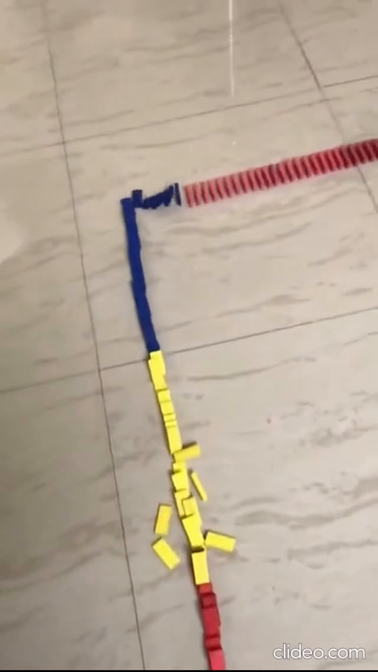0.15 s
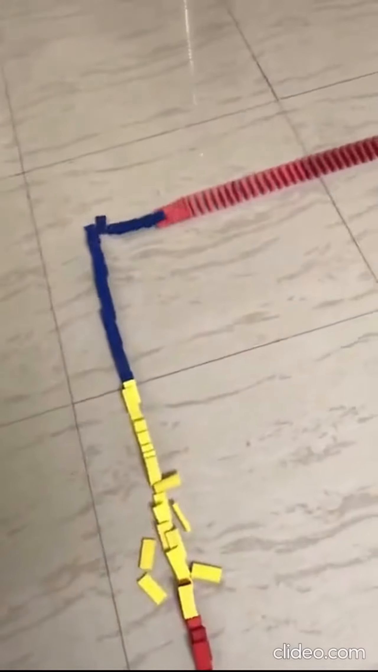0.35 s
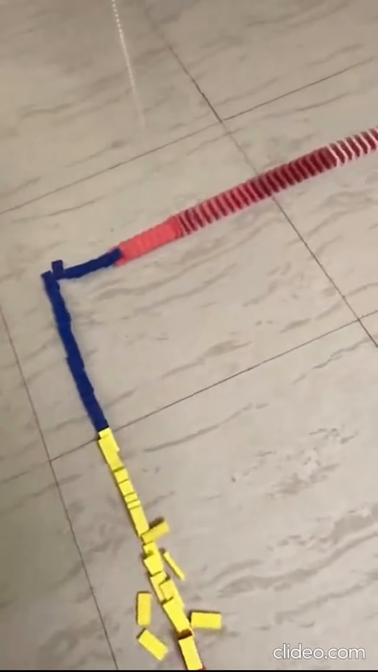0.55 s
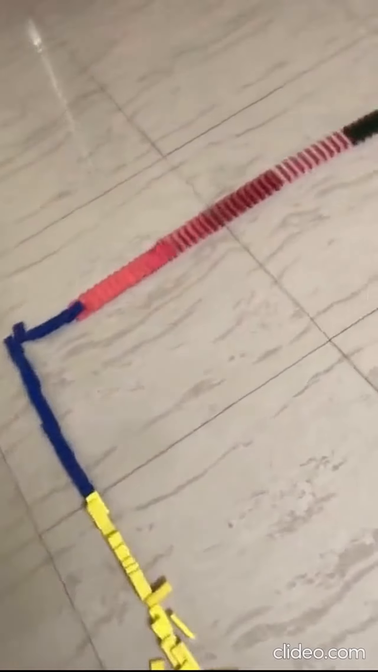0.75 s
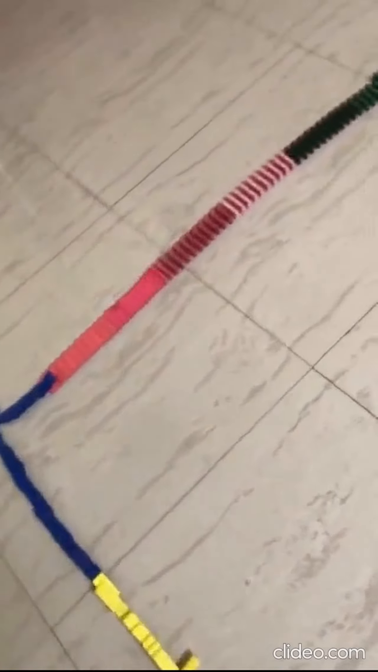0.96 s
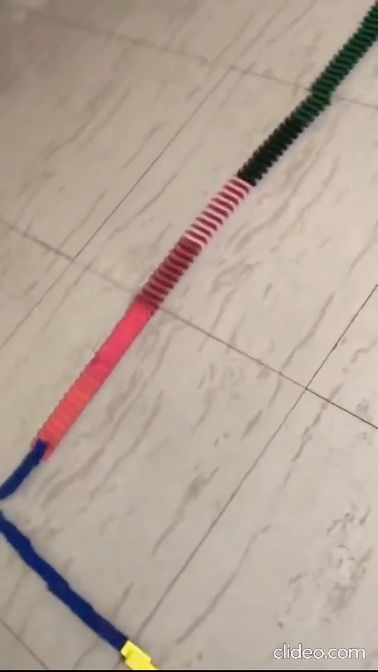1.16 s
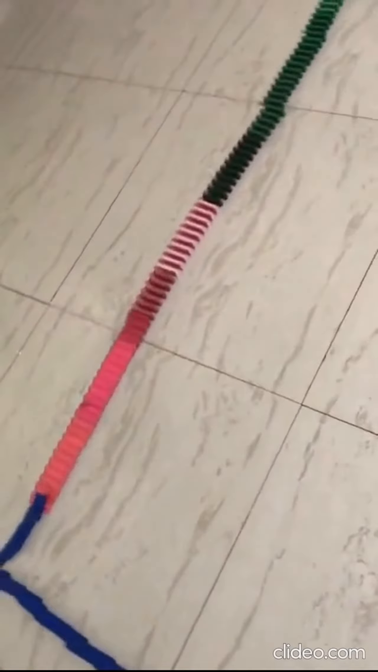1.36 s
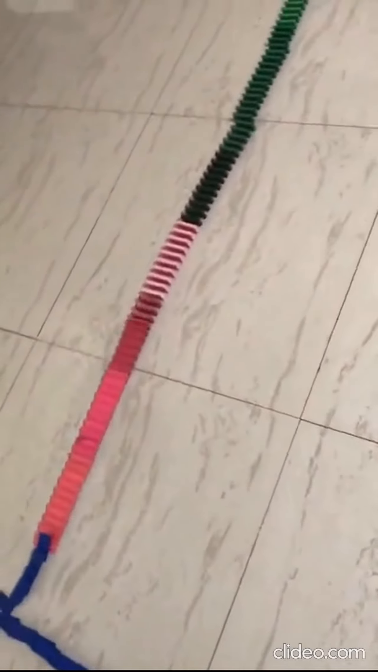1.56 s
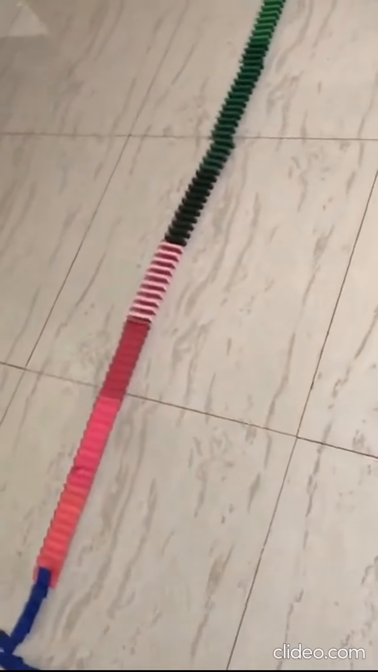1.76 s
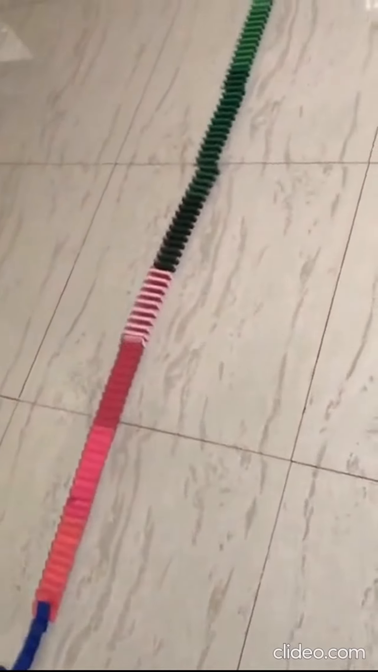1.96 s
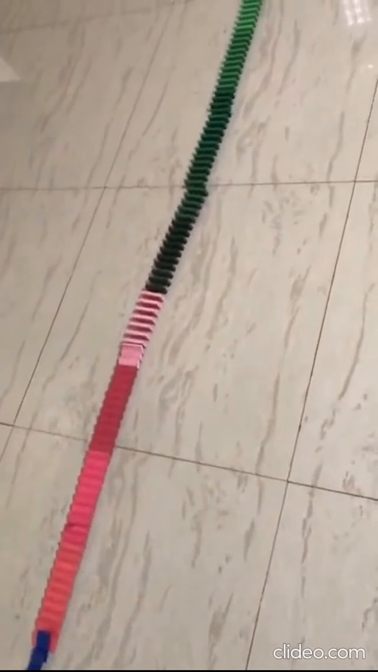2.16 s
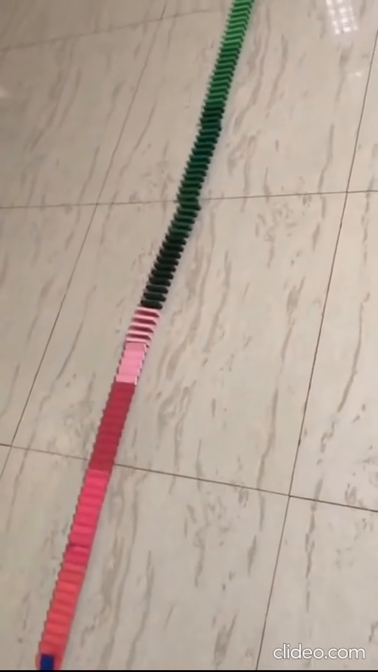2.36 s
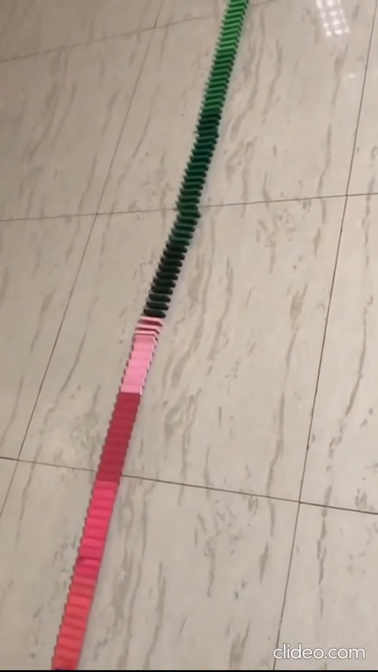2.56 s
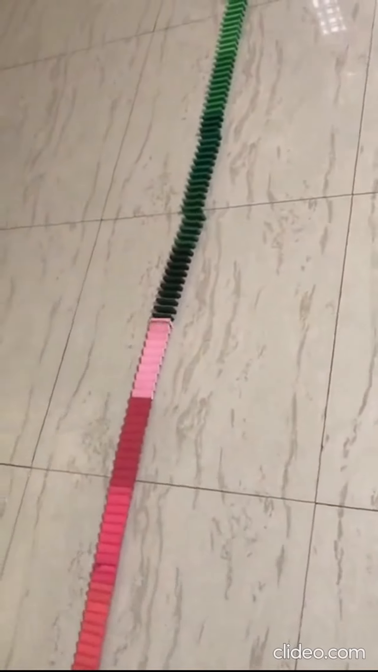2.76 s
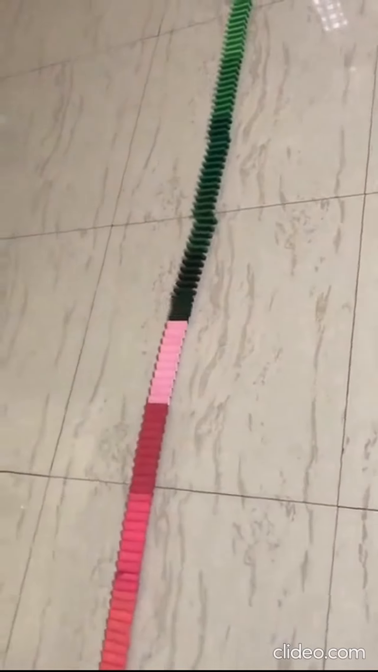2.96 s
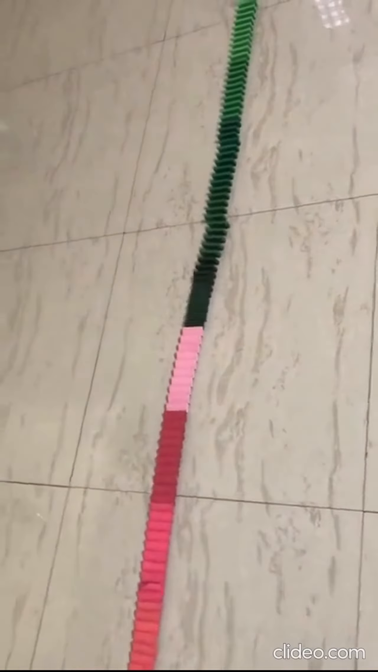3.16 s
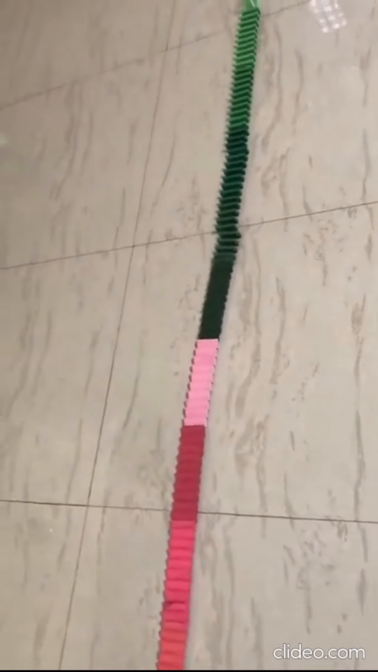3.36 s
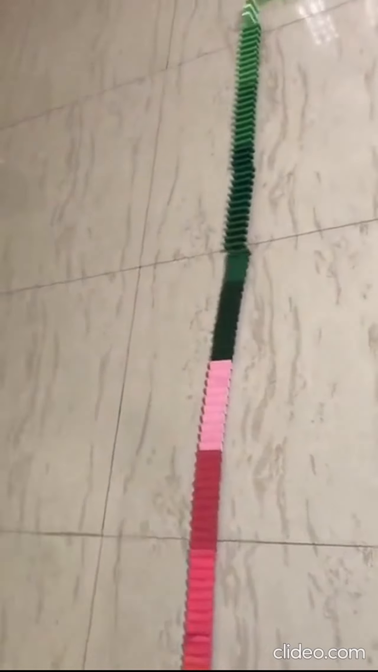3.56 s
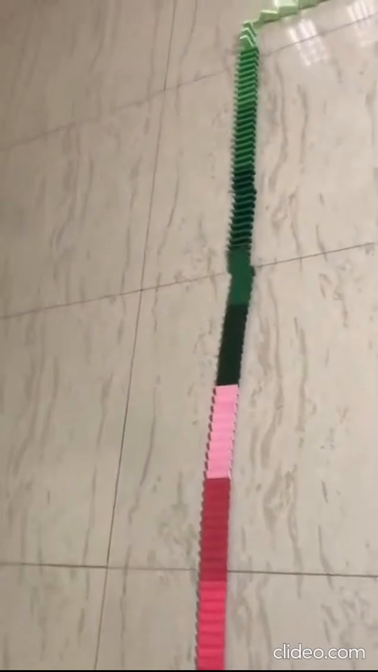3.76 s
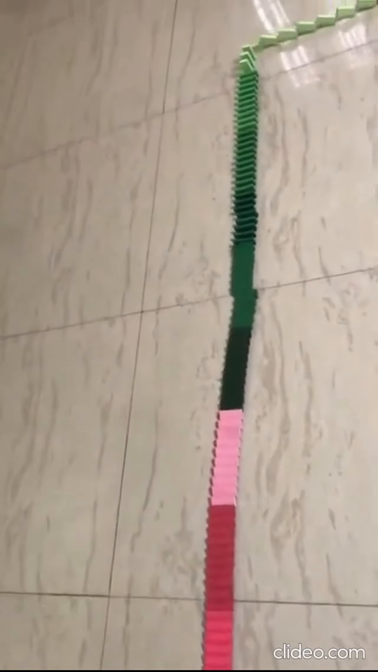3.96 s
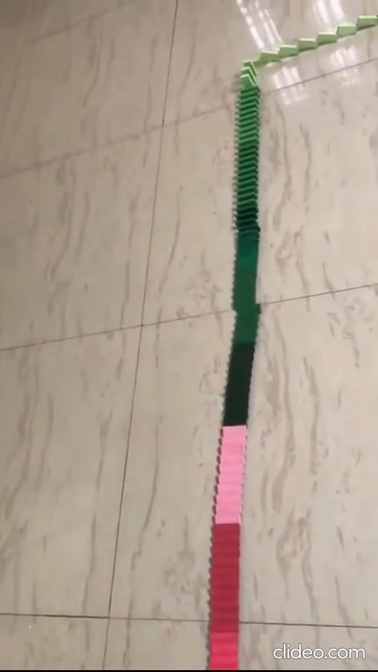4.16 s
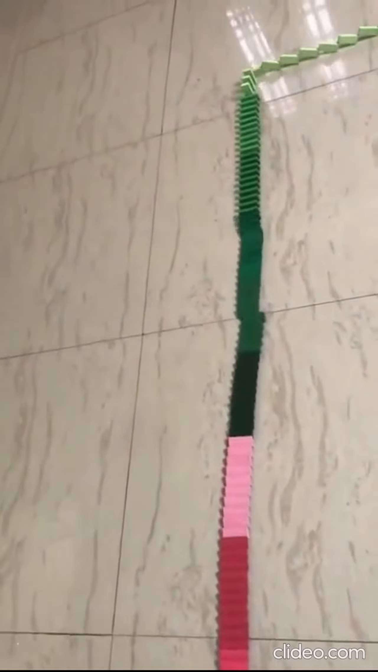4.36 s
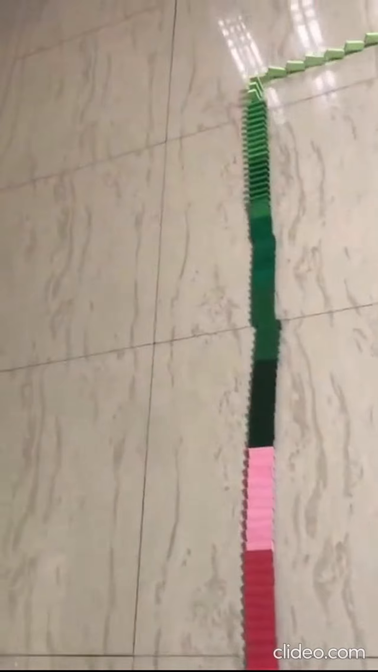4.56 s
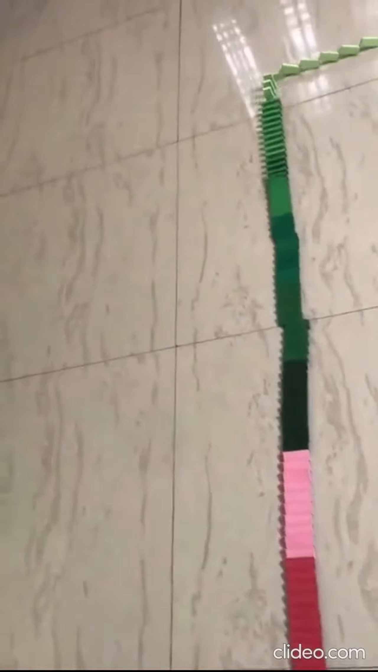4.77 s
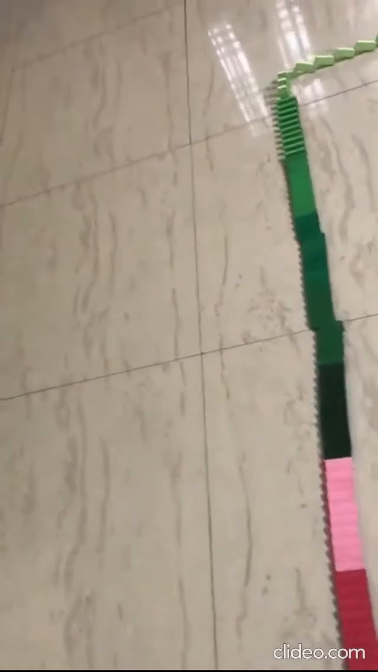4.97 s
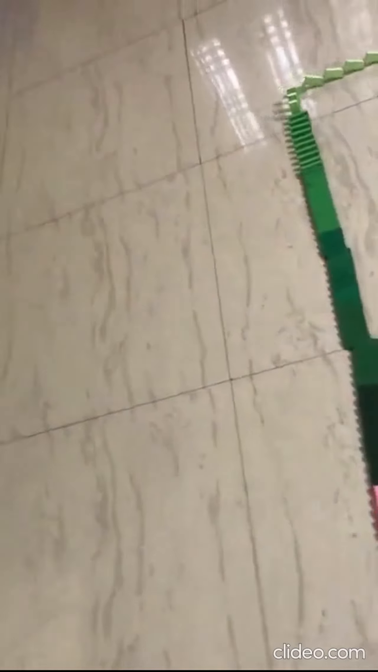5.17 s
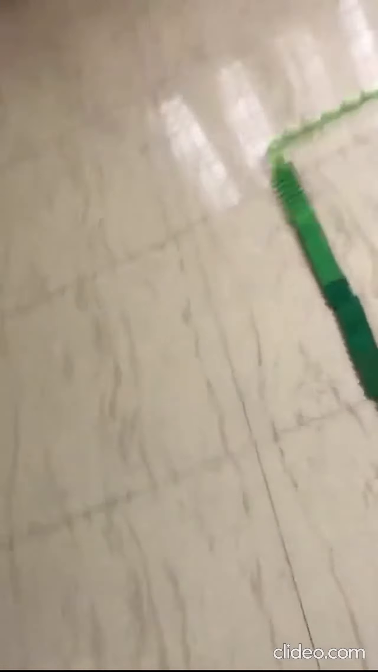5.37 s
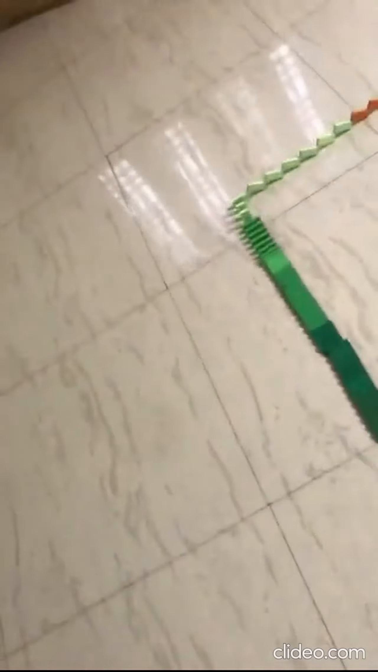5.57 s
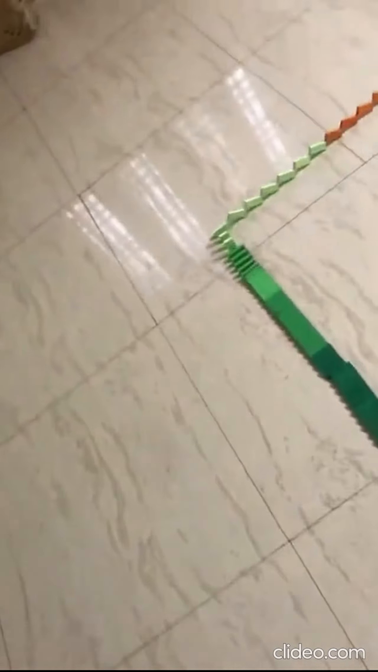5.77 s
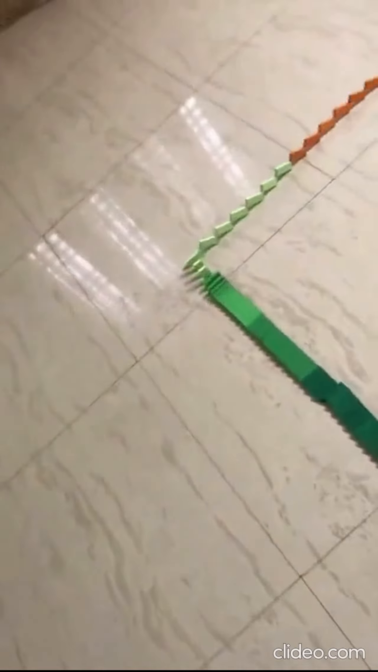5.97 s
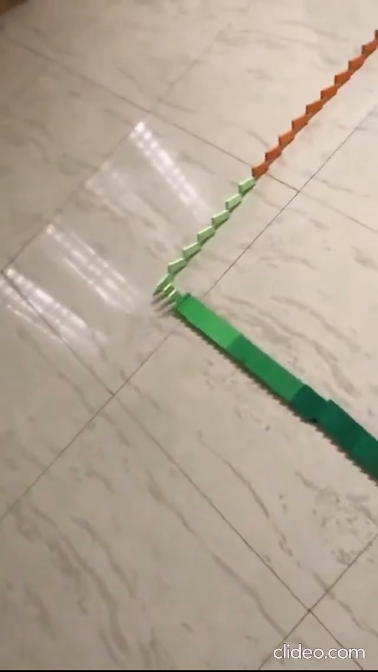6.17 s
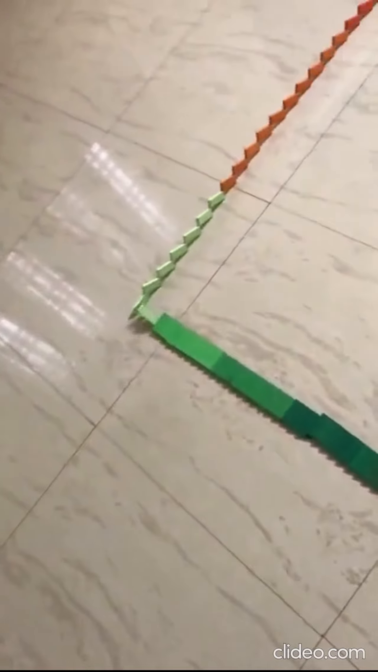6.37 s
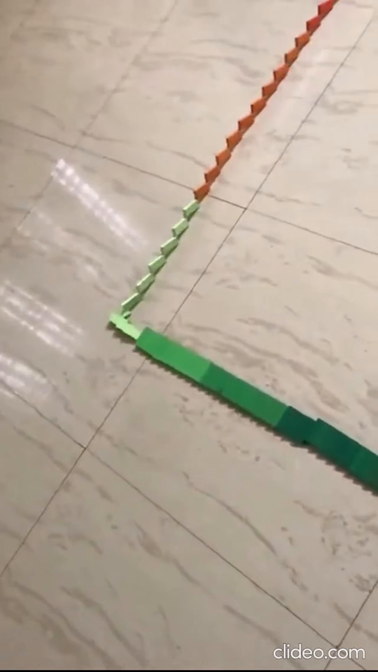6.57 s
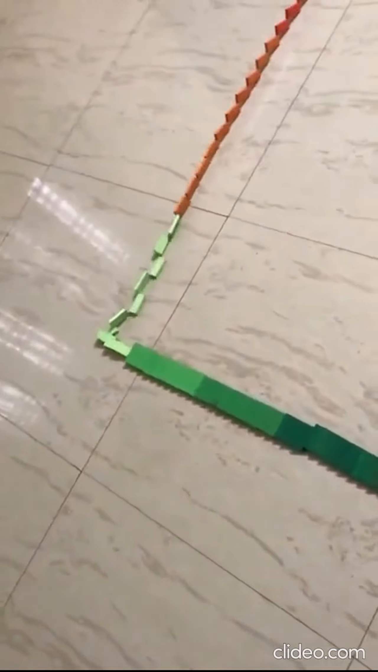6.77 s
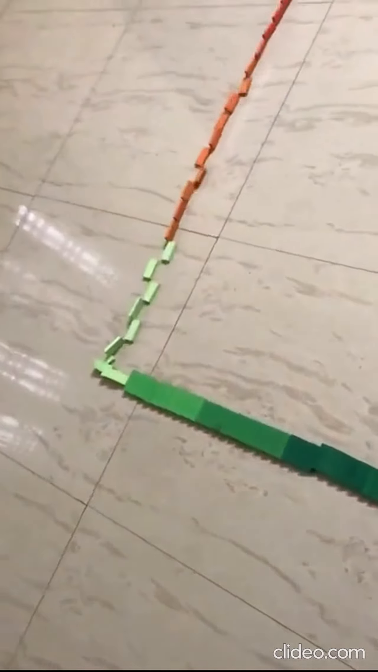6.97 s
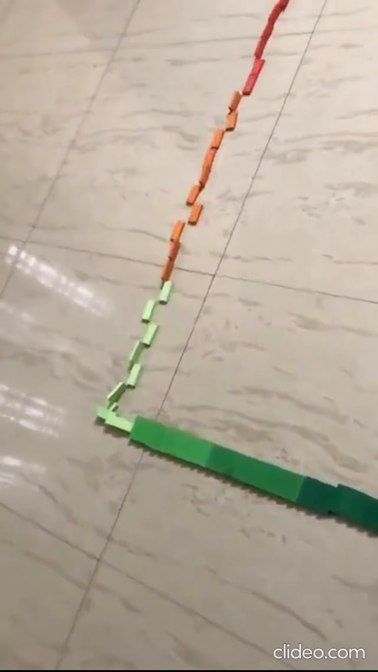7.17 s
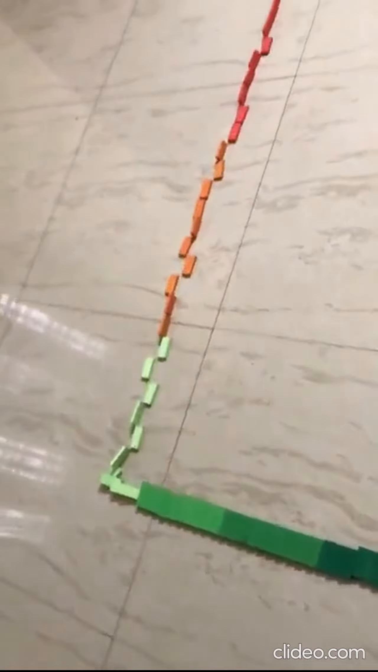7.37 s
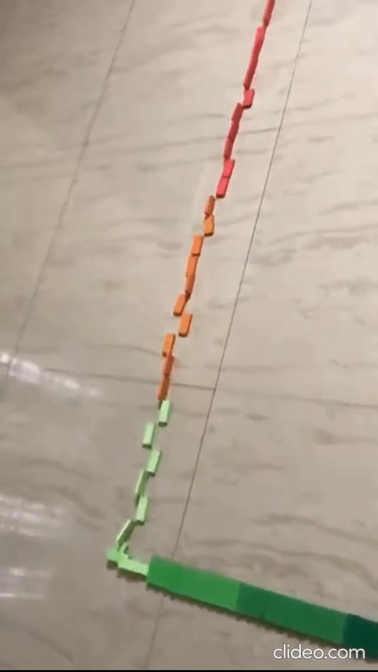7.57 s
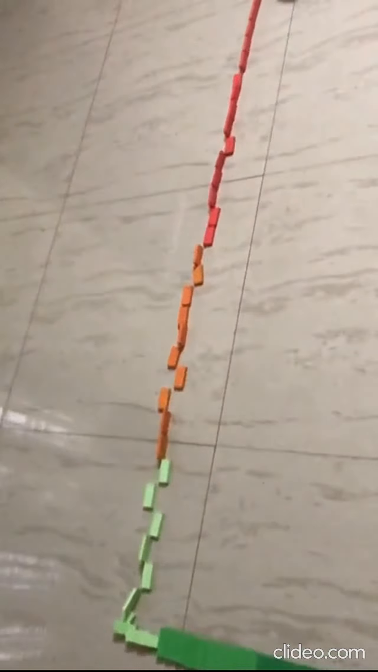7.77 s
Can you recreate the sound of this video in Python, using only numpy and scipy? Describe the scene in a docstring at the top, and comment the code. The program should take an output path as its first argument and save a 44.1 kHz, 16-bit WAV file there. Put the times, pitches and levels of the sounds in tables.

```python
"""In a bare, echoing room, over low rumble, faint hiss and soft shuffling, a chain of plastic tiles is falling.
Each tile clacks from a rough contact and rings in two high modes; small contacts patter on as the tiles settle.
Shoes slide early on as coloured noise; midway there are a few heel clicks, more scuffs and close hollow ticks.
Near the end a looser row falls flat and clatters with stronger rings, and the shuffling swells.
The room answers with wall echoes and a diffuse tail; a hand-held microphone hears it all."""
import sys
import numpy as np
from scipy import signal
from scipy.fft import rfft, irfft, next_fast_len
from scipy.io import wavfile

SR = 44100
rng = np.random.default_rng(int(sys.argv[2]) if len(sys.argv) > 2 else 0)


def convert_level_to_amplitude(level_db):
    """Map a level in decibels to its linear amplitude factor."""
    exponent = np.asarray(level_db, float) / 20
    return 10 ** exponent


def put_to_file(sound):
    """Save the sound as 16-bit audio at rate SR, in the file named by the first command-line argument."""
    columns = np.atleast_2d(sound).T  # one column per channel
    safe = np.clip(columns, -1, 1)
    whole_steps = np.round(safe * 32767)
    wavfile.write(sys.argv[1], SR, whole_steps.astype(np.int16))


N = 345303


def rms_one(x):
    """Scale to rms 1."""
    return x / np.sqrt(np.mean(x ** 2) + 1e-20)


def peak_one(rows):
    """Scale each row to peak 1."""
    return rows / np.abs(rows).max(axis=1, keepdims=True)


def at_hz(points, hz):
    """Read a table on a log-frequency axis."""
    table_hz, values = np.array(points).T
    return np.interp(np.log(np.maximum(hz, 1)), np.log(table_hz), values)


def coloured(spectrum):
    """Steady noise of a given spectrum, rms 1."""
    size = next_fast_len(N)
    gain = convert_level_to_amplitude(at_hz(spectrum, np.arange(size // 2 + 1) * SR / size))
    return rms_one(irfft(rfft(rng.standard_normal(size)) * gain, size)[:N])


def band(x, low_hz, high_hz):
    """Second-order band-pass."""
    return signal.sosfilt(signal.butter(2, [low_hz, high_hz], "band", fs=SR, output="sos"), x)


def resonances(x, peaks):
    """Parallel two-pole resonances, signs alternating."""
    out = 0
    for k, (hz, width, db) in enumerate(peaks):
        r = np.exp(-np.pi * width / SR)   # pole radius
        poles = [1, -2 * r * np.cos(2 * np.pi * hz / SR), r * r]
        ringing = signal.lfilter([1, 0, -1], poles, x) * (1 - r * r) / 2
        out = out + (-1) ** k * convert_level_to_amplitude(db) * ringing
    return out


def dying_sine(hz, t60, phase, t):
    """Damped sines, one per row; phase in cycles."""
    return np.sin(2 * np.pi * (hz * t + phase)) * convert_level_to_amplitude(-60 * t / t60)


def place(times, bursts):
    """Add each burst at its moment."""
    starts = np.round(np.asarray(times) * SR).astype(int)
    at = starts[:, None] + np.arange(bursts.shape[1])
    return np.bincount(at.ravel(), bursts.ravel(), N + bursts.shape[1])[:N]


def swell(s, db, rise, t60):
    """A level that rises from time s and dies away."""
    age = np.maximum(np.arange(N) / SR - s, 0)
    return convert_level_to_amplitude(db - 60 * age / t60) * (1 - np.exp(-age / rise))


# Groups of low room modes. Each mode: frequency in Hz, width in Hz, level within the group in dB.
MODE_GROUPS = [
    [(64.3, 12, 0)],
    [(87.1, 15.3, 2), (122.7, 19, 2)],
    [(159.15, 12.7, 0)],
    [(203, 36, 0)],
    [(407.6, 81, 0)],
]
# Steady level of each group, in dB.
MODE_DB = [-64.5, -64.5, -70.5, -77, -85]
# Lifts of single groups. Each row: start in seconds, length in seconds, nearby Hz, level added in power in dB.
RUMBLE_SWELLS = [(.2, 2.7, 63, -60), (4.1, .3, 63, -61.5), (4.7, .75, 63, -59.5), (7, .25, 63, -57),
                 (0.97, .35, 105, -58.5), (1.85, .35, 105, -60), (5.22, .45, 105, -62), (6, 1.9, 105, -56),
                 (0.59, .35, 160, -61), (2.27, .6, 160, -65), (6.23, 1.6, 160, -57), (3.95, 2.15, 205, -72),
                 (2.79, 0.98, 410, -71), (3.2, 0.68, 105, -64.5)]
# Spectrum of the broad rumble. Each row: frequency in Hz, relative level in dB per Hz.
RUMBLE_COLOUR = [(12, -106), (20, -27), (48, 0.5), (70, -2.5), (157, -1), (242, -18.5), (300, -20),
                 (390, -43), (660, -120)]


def rumble():
    """Low outside noise fills the lowest modes of the room, which swell separately."""
    edge_s, broad_db = 0.094, -63
    white, t = rng.standard_normal((len(MODE_GROUPS), N)), np.arange(N) / SR
    modes = np.array([rms_one(resonances(resonances(w, m), m)) for w, m in zip(white, MODE_GROUPS)])
    power = convert_level_to_amplitude(np.array(MODE_DB))[:, None] ** 2 * np.ones(N)
    centres = np.array([np.mean([hz for hz, _, _ in m]) for m in MODE_GROUPS])
    for s, length, hz, db in RUMBLE_SWELLS:
        gate = np.clip(np.minimum(t - s, s + length - t) / edge_s + .5, 0, 1)
        nearest = np.argmin(np.abs(centres - hz))
        power[nearest] += (convert_level_to_amplitude(db) * gate) ** 2
    return convert_level_to_amplitude(broad_db) * coloured(RUMBLE_COLOUR) + np.sum(np.sqrt(power) * modes, axis=0)


# Spectrum of the hiss. Each row: frequency in Hz, relative level in dB per Hz.
AIR_COLOUR = [(120, -23), (200, 6.5), (273, 0), (899, -13.5), (2090, -19), (3430, -12), (5040, -20.5),
              (6880, -19), (10300, -23), (15100, -16), (16000, -12)]


def air():
    """Faint, steady coloured noise."""
    return convert_level_to_amplitude(-64.5) * coloured(AIR_COLOUR)


# Swells of the shuffling. Each row: start in seconds, level in dB, rise in seconds, t60 in seconds.
SHUFFLES = [(2.1, -60.5, 0.26, 1.9), (2.8, -61, .15, 1.3), (3.7, -61, 0.21, 1.3), (7.0, -44.5, 0.14, 1.22)]
# Shoes sliding. Each row: start in seconds, level in dB, rise in seconds, t60 in seconds, grit in dB re slide.
SLIDES = [(0.337, -41.5, 0.025, 1, -21), (0.569, -55, 0.034, 1, -30), (4.42, -51.5, .01, 0.46, -13),
          (5.208, -52.5, 0.0048, 0.31, -3.5)]
# Spectrum of shoe friction. Each row: frequency in Hz, relative level in dB per Hz.
FRICTION_COLOUR = [(120, -46), (200, -19), (361, -1.5), (413, -5), (720, -3.5), (1060, -2.5), (2360, -12),
                   (3000, -24), (3900, -36), (6600, -120)]
# What a sliding sole favours. Each row: frequency in Hz, width in Hz, relative level in dB.
SOLE = [(328, 280, -14), (1100, 300, 9)]


def scuffs():
    """Dull friction noise: a soft shuffle, and single slides that swell and die with some bright grit."""
    shuffle_db, sole_db = -69.5, 1.5   # steady shuffle; sole resonance re plain friction
    shuffle = convert_level_to_amplitude(shuffle_db) + sum(swell(*row) for row in SHUFFLES)
    slides = [swell(*row[:4]) for row in SLIDES]
    grit = sum(convert_level_to_amplitude(row[4]) * slide for row, slide in zip(SLIDES, slides))
    friction = coloured(FRICTION_COLOUR)
    sole = rms_one(friction + convert_level_to_amplitude(sole_db) * rms_one(resonances(friction, SOLE)))
    bright = rms_one(band(rng.standard_normal(N), 2000, 18000))
    return shuffle * coloured(FRICTION_COLOUR) + sum(slides) * sole + grit * bright


# Stretches of the chain whose tiles lie and ring alike. Each row: start in seconds, lower ring in Hz,
# upper ring in Hz, stir at the tile edges in dB, stir of the flat faces in dB.
STRETCHES = [(0, 9000, 14360, -1, -12.5), (.15, 6740, 12800, 3.5, -2.5), (.4, 7300, 12600, 6, -2.5),
             (.6, 9300, 15000, 6.5, 5), (.7, 6800, 15800, 6, 4), (.93, 7800, 14500, 0., 4),
             (1.1, 7250, 14500, 3.5, -10), (2.75, 9700, 11700, 4, 2), (3.3, 7670, 10900, 1.5, 7.5),
             (3.7, 6830, 12200, 0.5, 4), (4.1, 8960, 15000, -3, 3), (4.38, 6400, 13600, 2, 6),
             (5.0, 6660, 14400, 4, 8), (6.48, 6260, 12200, 4, -3), (6.65, 8900, 14500, 0, -0.5),
             (6.71, 6730, 12900, -1, -0.5), (6.74, 8780, 14200, 0, 1), (6.9, 8800, 15500, 9.5, -2),
             (7.0, 8100, 13370, 4, -0.5), (7.05, 8900, 12800, 0, 0.5), (7.6, 8900, 13400, 11, 8.5),
             (7.77, 8660, 11500, 3., 7)]


def stretch(s):
    """Ring pitches and stir of the stretch that is falling at time s."""
    rows = np.array(STRETCHES)
    current = np.searchsorted(rows[:, 0], s, "right") - 1
    return rows[np.maximum(current, 0), 1:].T


def aftermath(s, gain, earlier_db):
    """Each fall leaves a stir in proportion to its strength that swells, then dies; the stirs add in power."""
    decay_s, rise_s = 0.052, 0.019   # decay of the amplitude, rise of the power
    r, q = np.exp(-2 / (decay_s * SR)), np.exp(-1 / (rise_s * SR))
    earlier = convert_level_to_amplitude(earlier_db) ** 2 * r ** np.arange(N)
    impulses = place(s, gain[:, None] ** 2) + 1e-18
    stir = signal.lfilter([1 - q], np.convolve([1, -r], [1, -q]), impulses)
    return np.sqrt(np.abs(stir) + earlier)


# The chain is already running: stir left at the edges and at the faces, in dB.
EARLIER_FALLS_DB = (-27.5, -27.5)
# Typical tile rings. Each row: frequency in Hz, width in Hz, relative level in dB.
TILE_RINGS = [(6060, 3000, 4), (9300, 460, 5.5), (12700, 4600, 0), (16200, 500, -5)]


def settling():
    """Many tiny uneven contacts after the falls: edges clack, faces slap the floor, tiles ring."""
    contacts_per_s = 450   # at the edges, and again at the faces
    clack_gain_db, ring_gain_db = -30.5, -26.5
    slap_from_edges_db, slap_from_faces_db = -35, -34.5
    s, clack_db, low_db, high_db = np.transpose(FALLS)
    edge_db, flat_db = stretch(s)[2:]
    edgewise = aftermath(s, convert_level_to_amplitude(clack_db + edge_db), EARLIER_FALLS_DB[0])
    flat = aftermath(s, convert_level_to_amplitude(flat_db) * np.hypot(convert_level_to_amplitude(low_db), convert_level_to_amplitude(high_db)), EARLIER_FALLS_DB[1])
    sizes = convert_level_to_amplitude(3.1 * np.minimum(rng.exponential(1, (2, N)), 4)) * rng.choice([-1, 1], (2, N))
    edges, faces = sizes * (rng.random((2, N)) < contacts_per_s / SR) + 1e-18
    clack = convert_level_to_amplitude(clack_gain_db) * edgewise * rms_one(resonances(edges, CLACK))
    slap_level = convert_level_to_amplitude(slap_from_edges_db) * edgewise + convert_level_to_amplitude(slap_from_faces_db) * flat
    slap = slap_level * rms_one(band(faces, 640, 3760))
    ring = convert_level_to_amplitude(ring_gain_db) * flat * rms_one(resonances(edges + faces, TILE_RINGS))
    return clack + slap + ring


# Decay of the room. Each row: frequency in Hz, t60 in seconds.
ROOM_T60 = [(300, 0.52), (1000, 1), (3500, 1), (8000, 0.66), (14000, 0.41)]
# First wall echoes. Each row: delay in seconds, gain ahead of the band-pass in dB.
WALL_ECHOES = [(.0120, -15.5), (0.015, -19), (.0175, -33), (.0215, -18)]


def room(x):
    """A few early wall echoes on a diffuse tail whose bands each die at their own rate."""
    tail_db, gap_s = -5.5, 0.0025
    early_lift, early_s = 0.97, 0.0072   # extra gain at the start, and its decay
    t, edges = np.arange(SR) / SR, 150 * 2 ** np.arange(0, 7.1, .5)
    white = rng.standard_normal((2, SR))
    tail = 0
    for k, (low, high) in enumerate(zip(edges, edges[1:])):
        tail = tail + band(white[k % 2], low, high) * convert_level_to_amplitude(-60 * t / at_hz(ROOM_T60, low))
    tail = tail * (1 - np.exp(-(t / gap_s) ** 3))   # held back until the first walls answer
    # uneven level in 50-sample steps: early reflections arrive singly
    lumps = convert_level_to_amplitude(3.1 * np.repeat(rng.standard_normal(SR // 50), 50) * np.exp(-t / 0.034))
    tail = tail * lumps * (1 + early_lift * np.exp(-t / early_s))
    tail = convert_level_to_amplitude(tail_db) * tail / np.sqrt(np.sum(tail ** 2))
    for s, db in WALL_ECHOES:
        start = round(s * SR)
        tail[start:start + 64] += convert_level_to_amplitude(db) * band(np.eye(64)[0], 1500, 7100)
    return signal.fftconvolve(x, tail)[:N]


# Tile on tile or floor. Each row: start in seconds, then peak level in dB of clack, lower ring and upper ring.
FALLS = [(0.046, -32.5, -16, -15.5), (0.1, -27.5, -27.5, -34), (0.179, -27.5, -30, -37),
         (0.2116, -26, -27, -37), (0.242, -27.5, -30.5, -36), (0.2703, -28, -36, -48),
         (0.2872, -28.5, -48, -51), (0.3054, -27.5, -36, -50), (0.4355, -32, -35.5, -42),
         (0.488, -32, -38, -34.5), (0.5772, -29.5, -33, -44), (0.629, -33.5, -37.5, -39),
         (0.6718, -30.5, -44, -42), (0.688, -41, -49, -56), (0.7184, -28, -40.5, -51),
         (0.821, -32, -46, -42), (0.868, -41, -56, -38), (0.9065, -29, -45, -48),
         (0.9443, -31.5, -34.5, -46), (0.9955, -31, -37.5, -60), (1.1647, -43.5, -52, -52),
         (1.239, -41.5, -55, -54), (1.3261, -36.5, -48.5, -60), (1.3984, -35.5, -46, -45),
         (1.4676, -42.5, -48, -45), (1.5449, -40, -52, -63), (1.6259, -41, -56, -61),
         (1.7058, -44, -56, -54), (1.7892, -42, -62, -55), (1.797, -43, -71, -68), (1.905, -41.5, -63, -47),
         (2, -45, -59, -50), (2.012, -45.5, -63, -73), (2.136, -46, -69, -54), (2.141, -47, -68, -63),
         (2.214, -46.5, -61, -54), (2.307, -48, -61, -55), (2.318, -39.5, -56, -57),
         (2.3826, -43, -51, -43), (2.392, -37.5, -52, -52), (2.579, -44, -69, -62.5),
         (2.6567, -38, -49, -49), (2.7873, -42, -55, -60), (2.7947, -36, -56, -66),
         (2.8378, -41, -56, -49.5), (2.8453, -35.5, -56, -71), (2.8934, -32, -48, -50),
         (2.9358, -38, -51, -57), (2.9418, -36.5, -65, -59), (3.0457, -33, -51, -56),
         (3.094, -38, -48, -54), (3.0978, -34.5, -49, -61), (3.1571, -38.5, -48, -73.5),
         (3.196, -47, -56, -50), (3.207, -31.5, -44.5, -61), (3.2564, -34.5, -54, -60),
         (3.3723, -47, -61, -55), (3.3827, -42, -58, -57.5), (3.459, -42, -66, -58),
         (3.5138, -35, -54, -59), (3.564, -38, -54, -53), (3.6165, -32, -48, -44), (3.6309, -37, -59, -54),
         (3.7316, -42, -55, -56), (3.778, -35, -38.5, -44), (3.7841, -35, -36, -48),
         (3.8282, -27, -45, -44), (3.8752, -28, -41, -45), (3.9233, -30, -50, -59),
         (3.9728, -34.5, -50, -62), (4.033, -42.5, -51, -62), (4.036, -40, -56, -60),
         (4.0909, -32, -42, -60), (4.149, -29.5, -50, -57), (4.1874, -38, -49, -45), (4.193, -36, -65, -71),
         (4.241, -31, -52, -42), (4.2828, -39, -56, -50), (4.2861, -32, -52, -61),
         (4.3408, -39, -39.5, -49), (4.348, -42, -55, -62), (4.352, -34, -46, -65), (4.4054, -29, -47, -47),
         (4.4152, -28, -46, -52), (4.4564, -34, -50, -62), (4.5194, -31, -55, -44), (4.565, -34, -56, -53),
         (4.5671, -32, -51, -40.5), (4.623, -31.5, -55, -57), (4.685, -28, -50, -47),
         (4.6955, -51, -70, -76), (4.7374, -38, -51, -50), (4.798, -34.5, -66, -53), (4.866, -31, -47, -59),
         (4.8818, -51, -72, -68), (4.9288, -32.5, -62, -44.5), (4.936, -36.5, -62, -70),
         (4.9402, -43, -61, -63), (4.9474, -59, -65, -63), (5.2336, -37.5, -63, -59),
         (5.3674, -39, -52, -62), (5.4678, -38.5, -64, -59), (5.5786, -47, -74, -58),
         (5.671, -45, -62, -55), (5.6777, -39.5, -59, -50), (5.7663, -56, -69, -67), (5.777, -44, -60, -61),
         (5.85, -45.5, -60, -50), (5.9578, -44, -64, -92.5), (5.9651, -35.5, -54, -48),
         (6.0374, -30.5, -53, -66), (6.047, -64, -53, -69), (6.359, -51, -54.5, -63),
         (6.435, -33, -49.5, -49), (6.5043, -33, -41, -69), (6.5124, -50, -39, -61),
         (6.5183, -33, -21, -44), (6.524, -36, -18.5, -27.5), (6.5366, -40, -26.5, -37),
         (6.5674, -30.5, -38, -41), (6.589, -30.5, -30, -33), (6.6282, -40, -30.5, -35),
         (6.6674, -54, -23, -23), (6.694, -54, -28.5, -37), (6.7056, -29, -32, -26),
         (6.72, -26.5, -37, -21.5), (6.7225, -32, -27.5, -28), (6.7507, -39, -24, -31),
         (6.7655, -29.5, -29, -45), (6.823, -31, -30, -39), (6.838, -33, -23, -28),
         (6.8467, -30.5, -19.5, -21.5), (6.905, -45, -25, -21), (6.9126, -33, -18, -13.5),
         (6.988, -36.5, -33, -36), (7.0195, -44, -28, -19.5), (7.0218, -40, -25.5, -16.5),
         (7.036, -49, -53, -23), (7.0632, -37, -27, -28), (7.073, -46, -34, -21), (7.108, -36, -30, -29),
         (7.123, -40, -29, -44), (7.143, -34, -26, -14), (7.1516, -50, -42, -22), (7.1946, -37, -36, -20),
         (7.2128, -38.5, -24.5, -18), (7.216, -45, -41, -19), (7.2385, -42, -36, -20),
         (7.2623, -41, -44, -20), (7.298, -41, -35, -24.5), (7.6999, -41.5, -54, -50),
         (7.73, -52, -49, -52), (7.7391, -36.5, -37.5, -35), (7.747, -45.5, -49, -41),
         (7.76, -45, -47, -45), (7.789, -38, -39, -34.5), (7.826, -39, -50, -36)]
# Body of the clack. Each row: frequency in Hz, width in Hz, relative level in dB.
CLACK = [(1385, 240, -10.5), (2752, 1040, -3), (3265, 782, 2.5), (3960, 730, -1.5)]


def falls():
    """A very short rough contact sounds the broad clack; every tile has its own two rings, each with a crack."""
    contact_s, rise_s = 0.00034, .00015
    lower_t60_s, upper_t60_s = .006, .005
    ring_scatter = .02   # tile to tile, share of the pitch
    s, clack_db, low_db, high_db = np.transpose(FALLS)[:, :, None]
    scatter = 1 + ring_scatter * rng.standard_normal((len(FALLS), 2)).T
    low_hz, high_hz = (stretch(s[:, 0])[:2] * scatter)[:, :, None]
    t = np.arange(1024) / SR
    contact = rng.standard_normal((len(FALLS), len(t))) * np.exp(-t / contact_s)
    phase, rise = rng.random((len(FALLS), 2)), 1 - np.exp(-t / rise_s)
    clack = peak_one(band(resonances(contact, CLACK), 1520, 5360))
    low_crack = convert_level_to_amplitude(-4.5) * peak_one(band(contact, 4820, 8360))
    high_crack = convert_level_to_amplitude(-8.5) * peak_one(band(contact, 12500, 15000))
    lower = rise * dying_sine(low_hz, lower_t60_s, phase[:, :1], t) + low_crack
    upper = rise * dying_sine(high_hz, upper_t60_s, phase[:, 1:], t) + high_crack
    rings = convert_level_to_amplitude(low_db) * peak_one(lower) + convert_level_to_amplitude(high_db) * peak_one(upper)
    return place(s[:, 0], convert_level_to_amplitude(clack_db) * clack + rings)


# Heel clicks. Each row: start in seconds, peak level in dB, top of the band in Hz.
HEELS = [(4.376, -43.5, 1220), (4.416, -31.5, 2650), (5.210, -40.5, 900)]


def heels():
    """A heel meets the floor: a dull, short click of decaying, roughened pressure."""
    s, db, top_hz = np.transpose(HEELS)
    t = np.arange(2048) / SR
    blows = (1 + .6 * rng.standard_normal((len(HEELS), len(t)))) * np.exp(-t / .0002)
    blows = np.array([band(blow, 450, hz) for blow, hz in zip(blows, top_hz)])
    return place(s, convert_level_to_amplitude(db)[:, None] * peak_one(blows))


# Dry ticks close to the microphone. Each row: start in seconds, peak level in dB, long ring in dB re the usual.
TICKS = [(4.874, -29, 3), (5.0985, -34.5, 4.), (5.3105, -19.5, 1), (5.5388, -33, 5)]
# Modes of the ticking part, long ring first. Each row: frequency in Hz, relative level in dB, t60 in seconds.
TICK_BODY = [(1036, -16, 0.067), (605, -14, 0.0065), (2000, -3.5, 0.0076), (4320, -4.5, 0.0057),
             (5400, -1, 0.0066), (10200, -7, 0.0048)]


def ticks():
    """A small hollow part snaps: a bright crack and damped rings at once, then a dull rebound."""
    crack_s, rebound_s = .0016, .002   # length of the crack, delay of the rebound
    s, db, ring_db = np.transpose(TICKS)
    t = np.arange(4096) / SR
    strength = convert_level_to_amplitude(rng.normal(0, 1.4, (len(TICKS), len(TICK_BODY))))
    strength[:, 0] *= convert_level_to_amplitude(ring_db)
    body = 0
    for k, (hz, level_db, t60) in enumerate(TICK_BODY):
        body = body + strength[:, [k]] * convert_level_to_amplitude(level_db) * dying_sine(hz, t60, 0, t)
    crack = convert_level_to_amplitude(-5.5) * rng.standard_normal(body.shape) * np.exp(-(t / crack_s) ** 2)
    rebound = convert_level_to_amplitude(-3) * np.exp(-((t - rebound_s) / 0.000082) ** 2)
    snap = body + crack - band(rebound, 380, 4000)
    return place(s, convert_level_to_amplitude(db)[:, None] * peak_one(snap))


def scene():
    """Tiles and heels in the room, close ticks nearly dry, background beneath."""
    far, near = falls() + settling() + heels(), ticks()
    echoes = room(far + convert_level_to_amplitude(-15) * near)
    background = scuffs() + rumble() + air()
    return (far + near + echoes + background)[None]


def low_pass(x):
    """Removes everything above the highest recorded frequency."""
    return signal.sosfilt(signal.butter(12, 17650, fs=SR, output="sos"), x)


# Dips in the microphone's response. Each row: frequency in Hz, width in Hz, depth in dB.
MICROPHONE_DIPS = [(5010, 1050, -3.5), (10800, 320, -2.5)]


def record(dry):
    """Two dips in the microphone's response, then a steep top cut, 32 dB down from 16100 Hz."""
    x = dry
    for hz, width, db in MICROPHONE_DIPS:
        x = x - (1 - convert_level_to_amplitude(db)) * resonances(x, [(hz, width, 0)])
    mix = signal.sosfilt(signal.cheby2(12, 32, 16100, fs=SR, output="sos"), x)
    return low_pass(mix)


dry = scene()
out = record(dry)
put_to_file(out)
```